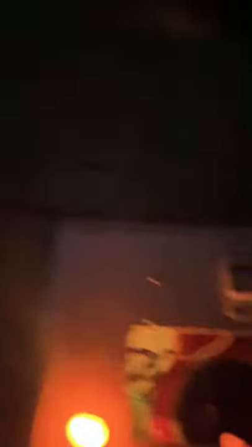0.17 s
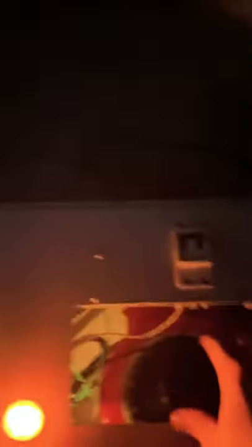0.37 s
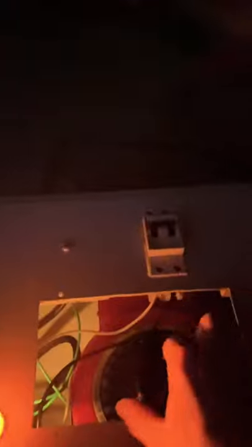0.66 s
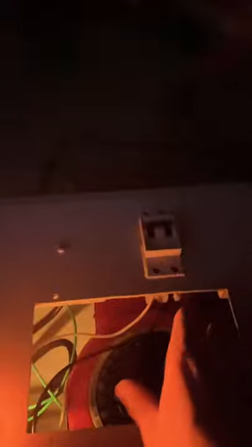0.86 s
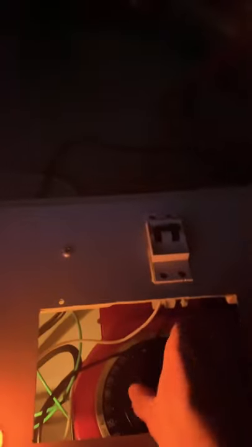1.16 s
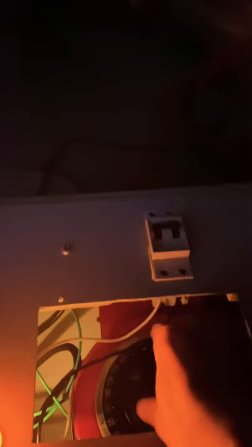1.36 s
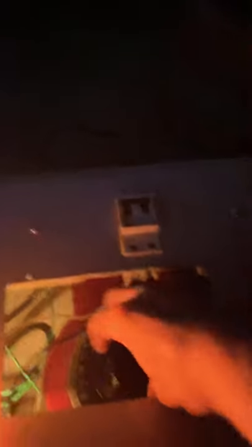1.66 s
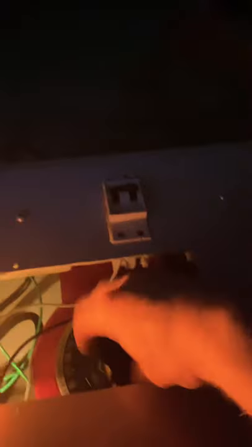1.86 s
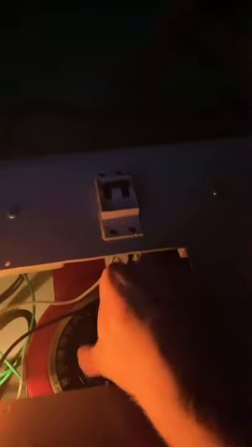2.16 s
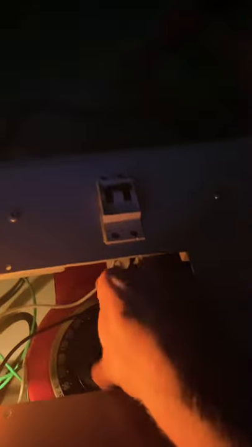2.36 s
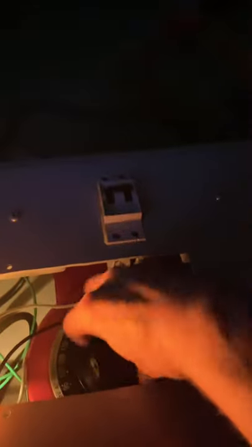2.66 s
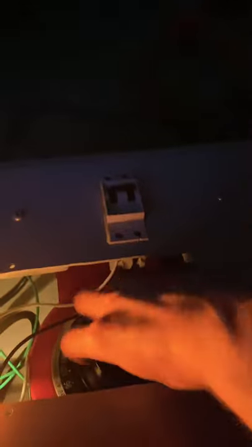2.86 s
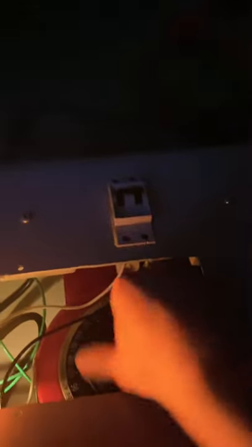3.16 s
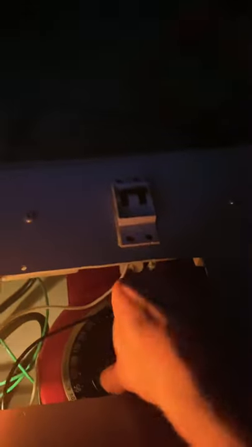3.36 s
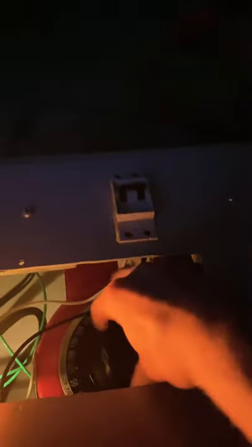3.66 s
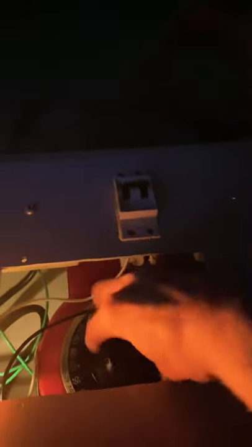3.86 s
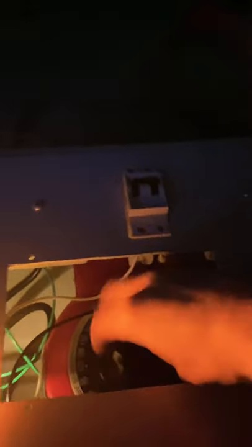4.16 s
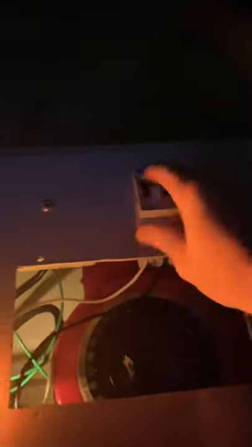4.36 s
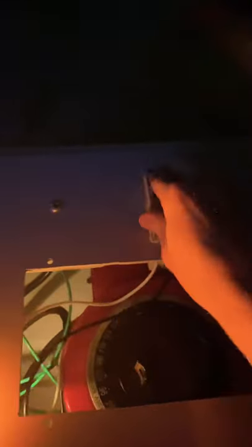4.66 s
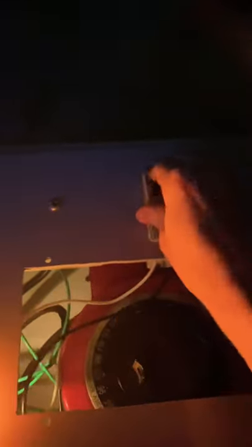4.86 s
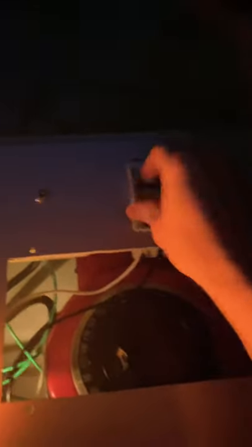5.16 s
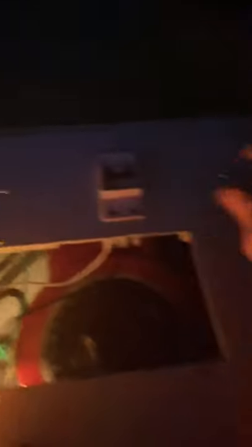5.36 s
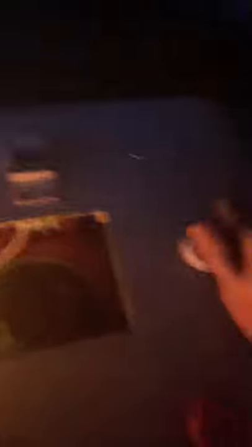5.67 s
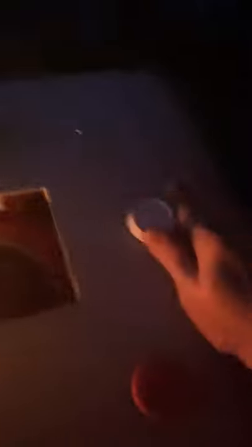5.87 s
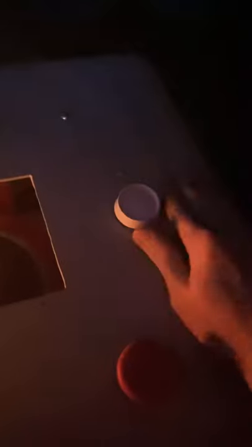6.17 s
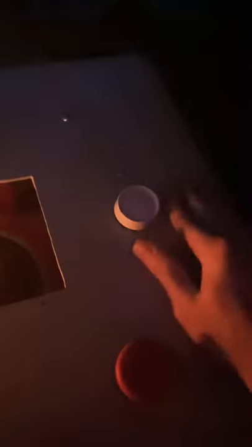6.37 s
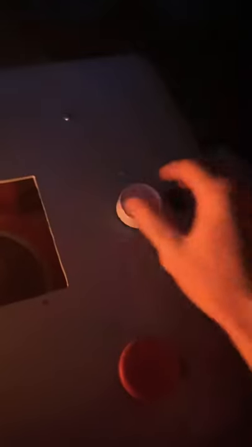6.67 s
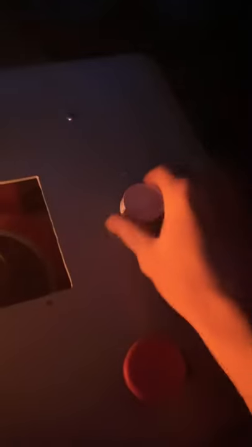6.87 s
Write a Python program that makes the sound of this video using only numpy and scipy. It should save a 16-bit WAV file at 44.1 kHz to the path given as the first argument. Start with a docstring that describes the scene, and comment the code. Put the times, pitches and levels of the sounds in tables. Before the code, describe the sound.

From the first instant a loud, harsh electrical buzz fills a walled yard at night: dense bright spark cracks bunched at twice mains rate, over a low throb, with ringing wall echoes. It weakens slightly until about 2.5 seconds, then breaks up into sparse, uneven snaps. From 2.8 to 3.6 seconds these run as a rapid rattle of single sharp cracks with low punches, spacing out towards the end; a last soft low thud comes near 3.75. The echoes die, revealing a much quieter wavering motor whine with airy whirr and faint hiss. A crisp dial click lands at 3.9, and a hard breaker snap with a panel thud at 4.9. Faint low handling rumble rises around 5.6. At 6.2 a tiny knob click switches off the motor; it coasts down in pitch and fades by 7, with two dull, faint case knocks near 6.75.

```python
"""A rotary spark gap fires a high-voltage coil in a walled yard, over motor whine, night hiss and rumble.
A hand turns the supply dial down: the mains-locked buzz of noise cracks, low pushes and echoes thins
out to single cracks, stops, and leaves one last low push. The gap motor, wavering sines over coloured
noise, whines on; the dial clicks and a breaker snaps, each a set of dying modes with a burst of noise.
A small knob clicks, the motor is switched off and coasts down, and the hand knocks against the case."""
import sys
import numpy as np
from scipy import signal
from scipy.fft import rfft, irfft, next_fast_len
from scipy.io import wavfile
from scipy.ndimage import uniform_filter1d

SR = 44100
rng = np.random.default_rng(int(sys.argv[2]) if len(sys.argv) > 2 else 0)


def attenuation_scalar(level_db):
    """Turn a level in dB into a linear amplitude multiplier (20 dB per decade)."""
    decades = np.asarray(level_db, float) / 20
    return 10 ** decades


def digitize_waveform(pressure):
    """Quantize a signal to 16-bit integers and store it at the path in sys.argv[1].

    Rows of a 2-D input are taken as channels; values are limited to [-1, 1].
    """
    field = np.atleast_2d(pressure).T
    bounded = np.clip(field, -1, 1)
    quanta = np.round(bounded * 32767).astype(np.int16)
    wavfile.write(sys.argv[1], SR, quanta)


N = 309141

# buzz of bunched sparks: start_s, relative_level_db, sparks_per_half_cycle
BUZZ = [(0.0, -28, 2.6), (0.101, -28.5, 3.45), (1.201, -29, 3.63), (1.63, -31.5, 2.98), (2.21, -31.5, 2.8),
        (2.55, -32, 2.87)]
BUZZ_END_S = BUZZ[-1][0]
MAINS_BEATS_PER_S = 120  # half cycles


def evened(x):
    """Scales to rms 1."""
    return x / np.sqrt(np.mean(x ** 2) + 1e-30)


def read(points, hz):
    """Reads a table on a log-frequency axis."""
    f, value = np.transpose(points)
    return np.interp(np.log(hz + 1), np.log(f + 1), value)


def colour(x, points, peaks=()):
    """Causal minimum-phase filter with the given spectrum and resonances."""
    hz = abs(np.fft.fftfreq(8192, 1 / SR))
    db = read(points, hz) + sum(d / (1 + (2 * (hz - f) / w) ** 2) for f, w, d in peaks)
    log_spectrum = np.conj(signal.hilbert(np.log(attenuation_scalar(db))))
    taps = np.fft.ifft(np.exp(log_spectrum)).real[:4096]
    taps = taps.reshape((1,) * (x.ndim - 1) + (-1,))
    return signal.oaconvolve(x, taps, axes=-1)[..., :x.shape[-1]]


def train(s, gain):
    """Impulses at the given moments."""
    return np.bincount(np.clip(np.round(s * SR).astype(int), 0, N - 1), gain, N)


def wander(size):
    """Slow random curve of rms 1, noise smoothed twice over size samples."""
    return evened(uniform_filter1d(uniform_filter1d(rng.standard_normal(N), size), size))


def patchy(x, patch_db, bins, frames):
    """Lets patches of a sound swell and sink; patch size in bins of 43 Hz and steps of 12 ms."""
    hz, t, z = signal.stft(x, SR, nperseg=1024)
    patches = uniform_filter1d(rng.standard_normal(z.shape[1:]), bins, axis=0)
    patches = uniform_filter1d(patches, frames, axis=1)
    return signal.istft(z * attenuation_scalar(patch_db * evened(patches)), SR, nperseg=1024)[1][:, :N]


def ports(pair):
    """Turns two unrelated versions of a sound into what two nearby microphone ports pick up."""
    # likeness of the ports: frequency_hz, likeness
    likeness = [(60, .999), (125, .999), (330, .98), (500, .89), (770, .6), (1170, .55), (1800, .83),
                (2800, .4), (4300, .5), (5800, .75), (6600, .994), (17000, .995)]
    # stereo phase: frequency_hz, left_lead_half_turns
    port_lead = [(0, 0), (3500, .1), (5800, .3), (6750, 1), (7900, 1), (9300, 2), (11400, 2), (12650, 3),
                 (14300, 3), (15500, 4), (17000, 4)]
    size = next_fast_len(N + 4096)
    hz = np.fft.rfftfreq(size, 1 / SR)
    a, b = rfft(pair, size)
    same = np.clip(read(likeness, hz), 0, 1)
    turn = np.exp(.5j * np.pi * np.interp(hz, *np.transpose(port_lead)))
    shared = np.sqrt((1 + same) / 2) * a
    apart = np.sqrt((1 - same) / 2) * b
    return irfft(np.array([(shared + apart) * turn, (shared - apart) / turn]), size)[:, :N]


def yard(x, onset_s=0.0038, early=2.2, early_s=0.082):
    """Dense echoes, strongest from the near walls, each band dying at its own speed; energy 1."""
    # decay of the yard: frequency_hz, t60_s
    yard_decay = [(100, 0.24), (400, 0.64), (1000, 0.58), (2500, 0.92), (5000, 0.74), (8000, 0.61),
                  (12000, 0.49), (16000, 0.26)]
    hz, t, z = signal.stft(rng.standard_normal((2, SR)), SR, nperseg=256)
    decay = attenuation_scalar(-60 * t / read(yard_decay, hz)[:, None])
    tail = signal.istft(z * decay, SR, nperseg=256)[1]
    t = np.arange(tail.shape[1]) / SR
    tail = tail * np.clip(t / onset_s, 0, 1) ** 2 * (1 + early * np.exp(-t / early_s))
    return signal.oaconvolve(x[None], tail / np.linalg.norm(tail[0]), axes=1)[:, :N]


def drifting_yard(x, drift_s=1.4):
    """Three echo patterns take turns as the hand-held microphone drifts through them."""
    turn = np.pi * np.arange(len(x)) / SR / drift_s
    return sum(yard(x * np.sqrt(2 / 3) * abs(np.cos(turn + k * np.pi / 3))) for k in range(3))


def singles(chance_db=-24, chance_end_s=2.75, chance_window=.3, first_half_share=.6, recharge_s=.007):
    """Listed single sparks, and chance sparks in the gaps, early in either half cycle."""
    # single sparks at low voltage: start_s, level_db
    listed_sparks = [(2.6, -25.5), (2.6587, -24), (2.71, -35), (2.7592, -31.5), (2.785, -23), (2.8035, -24),
                     (2.8191, -26.5), (2.833, -26), (2.8504, -20.5), (2.8853, -25), (2.9, -22.5),
                     (2.9327, -25.5), (2.9428, -25.5), (2.9588, -24), (2.977, -24.5), (2.999, -27.5),
                     (3.01, -27), (3.0261, -23.5), (3.0418, -27), (3.052, -24.5), (3.068, -29),
                     (3.084, -22.5), (3.093, -29.5), (3.1099, -26), (3.124, -23.5), (3.143, -24.5),
                     (3.1593, -20.5), (3.176, -24), (3.1951, -21.5), (3.21, -28), (3.2273, -20.5),
                     (3.242, -27.5), (3.258, -22), (3.2684, -21.5), (3.2990, -18.5), (3.3191, -27.5),
                     (3.3491, -18.5), (3.3835, -21.5), (3.3935, -21.5), (3.41, -28), (3.4503, -17.5),
                     (3.4624, -27), (3.5016, -19.5), (3.5364, -19.5), (3.5852, -18)]
    listed_s, listed_db = np.transpose(listed_sparks)
    # one chance candidate per full mains cycle
    beats = np.arange(int(BUZZ_END_S * MAINS_BEATS_PER_S) + 1, int(chance_end_s * MAINS_BEATS_PER_S), 2)
    half, place = rng.random((len(beats), 2)).T
    chance_s = (beats + (half > first_half_share) + chance_window * place) / MAINS_BEATS_PER_S
    chance_s = chance_s[abs(chance_s[:, None] - listed_s).min(1) > recharge_s]
    at = np.append(listed_s, chance_s)
    db = np.append(listed_db, np.full(len(chance_s), chance_db))
    order = np.argsort(at)
    return at[order], db[order]


def firings(single_s, single_db, spread_db=3.5, crack_s=0.0021):
    """Moments and sizes of all sparks: bunches locked to the mains, then single ones."""
    s, level_db, per_beat = np.transpose(BUZZ)
    beats = np.arange(-60, int(BUZZ_END_S * MAINS_BEATS_PER_S))
    place, chance, size = rng.random((len(beats), 6, 3)).T
    # six slots in the part of the half cycle with enough voltage
    window_start, window_length = -.1, .42  # half cycles
    slot = (np.arange(6)[:, None] + place) / 6
    at = (beats + window_start + window_length * slot) / MAINS_BEATS_PER_S
    count = np.clip(np.interp(at, s, per_beat), .5, 6)
    gain = attenuation_scalar(np.interp(at, s, level_db) + spread_db * (2 * size - 0.5))
    gain = gain * np.sqrt(SR / MAINS_BEATS_PER_S / count)
    single = attenuation_scalar(single_db) * np.sqrt(crack_s * SR)
    return np.append(at, single_s), np.append(gain * (chance < count / 6), single)


def thump(x, lag_cycles=1.177):
    """The low push sweeps downward: the deeper the part, the later it comes."""
    # low push of a spark: frequency_hz, relative_db_per_hz
    push_colour = [(25, -23.5), (60, 0), (120, -2), (200, -4), (400, -3), (900, -5.5), (1800, -4.5),
                   (3000, -34), (5000, -72)]
    hz = np.fft.rfftfreq(8192, 1 / SR)
    late = np.exp(-2j * np.pi * lag_cycles * np.log(1 + hz / 15) + 2j * np.pi * hz * lag_cycles / 2500)
    kernel = np.roll(irfft(attenuation_scalar(read(push_colour, hz)) * late), 2048)
    return signal.oaconvolve(x, kernel / np.linalg.norm(kernel))[2048:][:N]


def pushes(single_s, spread_db=3.5, scatter_s=0.00061, power=0.53, bunch_s=0.0018, ground=0.64,
           sharpen_s=.8):
    """A low push per half cycle of buzz and per single spark; a longer charge pushes harder."""
    # push after one half cycle of charging: start_s, level_db
    push_level = [(0, -31.5), (1.5, -33), (2.3, -29.5), (2.6, -23.5), (3.0, -20.5), (3.3, -24),
                  (3.6, -22.5)]
    # last low push, without a crack: start_s, level_db
    last_s, last_db = (3.742, -31)
    beats = (np.arange(int(BUZZ_END_S * MAINS_BEATS_PER_S)) + 0.087) / MAINS_BEATS_PER_S
    size, late = rng.standard_normal((len(beats) + len(single_s), 2)).T
    at, n = np.append(beats, single_s), len(beats)
    charge = (np.diff(at, prepend=-1 / MAINS_BEATS_PER_S) * MAINS_BEATS_PER_S) ** power
    size[n:] /= 4  # a lone spark empties a full charge, so it varies little
    gain = charge * attenuation_scalar(np.interp(at, *np.transpose(push_level)) + spread_db * size)
    # bunched sparks smear their pushes into one dull throb; lone sparks gain a sharp front
    blur = np.hanning(round(2 * bunch_s * SR))
    sharp = np.clip((at - BUZZ_END_S) / sharpen_s, 0, 1)
    at[:n] += scatter_s * late[:n]
    dull = train(np.append(at, last_s), np.append(gain * (1 - sharp), attenuation_scalar(last_db)))
    dull = signal.oaconvolve(dull, blur / blur.sum())[:N]
    low = thump(dull + train(at, gain * sharp))
    return np.array([low, ground * np.roll(low, 200)])  # weaker version off the ground, 4.5 ms later


def swayed(pair, body_width_hz=130):
    """The lead of one port over the other follows the turning of the hand; a low band of the roar drifts."""
    # hand turning the ports against the coil: start_s, low_lead_half_turns, middle_lead_half_turns
    sway = [(0, 0, 0.027), (.15, 0, 0.28), (.22, 0.034, 0.94), (.35, 0, 1), (0.451, 0, 0.082),
            (1.35, 0, 0.53), (1.45, 0, 0.65), (1.55, 0, 0), (1.85, 0, 0.65), (2.2, 0.0028, 0.66),
            (2.5, 0.16, 0), (2.75, 0.21, 0), (2.9, 0.62, 0.09), (3.7, 0.43, 0.37)]
    # low band's share in the sway: frequency_hz, share
    low_share = [(100, 0), (250, 0.5), (500, 0.97), (700, 0.12)]
    # middle band's share in the sway: frequency_hz, share
    middle_share = [(500, 0), (750, 1), (1500, 0.2), (2200, 0.06)]
    # drifting low band: start_s, centre_hz, boost_db
    body_drift = [(0, 468, 7.5), (.4, 470, 4), (.55, 414, 6), (1.2, 416, 6), (1.6, 426, 8), (1.9, 380, 5),
                  (2.25, 370, 10.5), (2.6, 384, 6), (3.0, 375, 7), (3.7, 380, 0)]
    hz, t, z = signal.stft(pair, SR, nperseg=2048)
    s, low, middle = np.transpose(sway)
    lead = np.outer(read(low_share, hz), np.interp(t, s, low))
    lead = lead + np.outer(read(middle_share, hz), np.interp(t, s, middle))
    turn = np.exp(.5j * np.pi * lead)
    s, body_hz, body_db = np.transpose(body_drift)
    off = 2 * (hz[:, None] - np.interp(t, s, body_hz)) / body_width_hz
    body = attenuation_scalar(np.interp(t, s, body_db) / (1 + off ** 2))
    return signal.istft(z * body * np.array([turn, 1 / turn]), SR, nperseg=2048)[1][:, :N]


def sparks(buzz_db=-2.5, buzz_echo_db=1., single_echo_db=.3, brief_from_s=3.44):
    """Every spark is a ragged crack of a few milliseconds and yard echoes, over the low pushes."""
    # spark spectrum: frequency_hz, relative_db_per_hz
    spark_colour = [(150, -41), (300, -11.5), (750, -11), (1100, -10.5), (1700, -12), (2300, -1.5),
                    (3000, -3.5), (3700, -7), (4800, 0.6), (6500, -0.5), (8500, -0.37), (10500, -2),
                    (13500, 3.5), (15500, -3.5)]
    # first arrival over the echoes: frequency_hz, tilt_db
    crack_tilt = [(150, -2.5), (1500, 0.5), (5000, 1), (9000, 4), (13000, 1), (16000, 6.5)]
    # standing echoes of the yard: frequency_hz, width_hz, level_db
    yard_peaks = [(893, 60, 10.5), (1181, 81, 5), (1503, 320, 8), (2060, 180, 4.5), (2156, 70, 10),
                  (2320, 140, -12.5), (2630, 59, 5), (2700, 99, 8), (3680, 500, 1), (4177, 45, 8),
                  (4730, 70, 5.5), (4930, 180, -0.5), (5275, 83, 6), (5710, 60, 4.5), (8020, 180, 8),
                  (13800, 810, 3.5)]
    # arrivals within one crack: delay_s, level_db, t60_s
    arrivals = [(0, -1, .006), (.001, 0, .007), (.003, -8, .012)]
    single_s, single_db = singles()
    at, gain = firings(single_s, single_db)
    buzzing = at < BUZZ_END_S
    gain[buzzing] *= attenuation_scalar(buzz_db)
    # crack kinds: eight long ones, then four brief ones for the last sparks, which quench at once
    last = at > brief_from_s
    kind = rng.integers(0, 8, len(at)) // np.where(last, 2, 1) + 8 * last
    t = np.arange(400) / SR
    shape = sum(np.clip((t - late) / 0.0011, 0, 1) * attenuation_scalar(db - 60 * np.maximum(t - late, 0) / t60)
                for late, db, t60 in arrivals)
    quench = attenuation_scalar(-60 * np.maximum(t - .0015, 0) / .012)
    brief = np.where(np.arange(12)[:, None, None] >= 8, quench, 1)
    cracks = colour(rng.standard_normal((12, 2, 400)) * shape * brief, spark_colour)
    cracks = colour(cracks, crack_tilt)
    cracks /= np.linalg.norm(cracks, axis=2, keepdims=True)
    near = 0
    for k in range(12):
        hits = train(at, gain * (at >= 0) * (kind == k))
        near = near + signal.oaconvolve(hits[None], cracks[k], axes=1)[:, :N]
    ahead_s = .5  # firing before the start, so that the yard is already ringing
    clicks = train(at + ahead_s, gain * attenuation_scalar(np.where(buzzing, buzz_echo_db, single_echo_db)))
    spark = colour(np.eye(1, 4096)[0], spark_colour, yard_peaks)
    clicks = signal.oaconvolve(clicks, spark / np.linalg.norm(spark))[:N]
    far = drifting_yard(clicks)[:, round(ahead_s * SR):]
    far = np.pad(far, ((0, 0), (0, N - far.shape[1])))
    far = patchy(far, patch_db=1.1, bins=10, frames=40)  # bright and hollow bands shift about
    return swayed(ports(near + far + pushes(single_s)))


def motor(waver_db=1.1, side_waver=1.6, coast_waver_db=4, throb=.2, left_db=-1.):
    """Shaft orders waver over a whirr of air that throbs as the six electrodes pass per turn."""
    # loudness: start_s, whine_db, ninth_multiple_db, whine_octave_db, whirr_db
    motor_levels = [(0, -72, -84, -101, -81), (3.9, -74.5, -89, -78.5, -76), (4.3, -70.5, -89, -81, -69.5),
                    (4.7, -69, -83, -80, -68), (5.3, -69, -84, -78.5, -68), (5.56, -67.5, -83, -74, -69),
                    (6.2, -66.5, -90, -72, -70), (6.265, -72, -96, -80, -68), (6.31, -75, -92, -68, -72),
                    (6.375, -78, -91, -71.5, -73), (6.405, -81, -96.5, -76, -73),
                    (6.46, -81, -97, -77, -74.5), (6.49, -79, -89, -88, -75.5),
                    (6.54, -82, -85.5, -74, -80), (6.57, -85, -90.5, -90.5, -78), (6.7, -85, -88, -94, -83),
                    (6.81, -89, -92, -89, -84.5), (7.02, -110, -110, -102, -96)]
    # shaft orders: multiple_of_shaft_speed, level_over_whine_db
    whine_orders = [(2, -19), (5, -20), (6, 1), (7, -15.5), (10, -16), (15, -15.5), (18, -11.5), (24, -14),
                    (25, -14), (26, -21.5), (30, -14.5), (45, -18.5)]
    # air spectrum: frequency_hz, relative_db_per_hz
    whirr_colour = [(60, -9.5), (150, -11), (300, -4.5), (700, -0.5), (1400, -1), (2200, -1.1), (3200, 0.5),
                    (4500, -3), (6500, -19.5), (8500, -18), (11000, -22), (13000, -33.5), (15500, -41.5)]
    # resonances of the motor housing: frequency_hz, width_hz, level_db
    housing = [(1362, 82, 3), (1505, 86, 5), (2103, 250, 5.5), (2600, 130, -1.5), (3130, 250, -4),
               (3575, 120, -0.5), (3950, 180, -0.5), (1150, 100, -5.5)]
    run_turns_per_s, off_s, coast_s, dull_db_per_s = 87.65, 6.212, 1.5, 3.5
    s, *columns = np.transpose(motor_levels)
    t = np.arange(N) / SR
    whine_db, ninth_db, octave_db, whirr_db = (np.interp(t, s, c) for c in columns)
    since_off = np.maximum(t - off_s, 0)
    turns = np.cumsum(run_turns_per_s * np.exp(-since_off / coast_s)) / SR
    coasting = np.clip((t - off_s) / .1, 0, 1)
    # while coasting, multiples above the sixth fade faster the higher they are
    orders = [(k, db + whine_db - max(k - 6, 0) * dull_db_per_s * since_off) for k, db in whine_orders]
    whine = 0
    for k, db in orders + [(9, ninth_db), (12, octave_db)]:
        waver = waver_db * (1 if k % 6 == 0 else side_waver) * wander(4000)
        waver = waver + coast_waver_db * coasting * wander(900)
        whine = whine + attenuation_scalar(db + waver) * np.sqrt(2) * np.sin(2 * np.pi * (k * turns + rng.random()))
    air = colour(rng.standard_normal((2, N)), whirr_colour, housing)
    air = evened(patchy(air, patch_db=.8, bins=8, frames=10))
    air = air * (1 + throb * np.cos(2 * np.pi * 6 * turns))
    return whine * attenuation_scalar([[left_db], [-left_db]]) + ports(attenuation_scalar(whirr_db) * air)


def night(hiss_db=-79.5):
    """Quiet outdoor hiss and a faint wandering low rumble, both coloured noise."""
    # hiss spectrum: frequency_hz, relative_db_per_hz
    hiss_colour = [(40, -24.5), (80, -12), (200, -14.5), (500, -5.5), (1200, -9), (2500, -20.5),
                   (3200, -32.5), (4300, -24.5), (6000, -36.5), (10000, -39), (15000, -48)]
    # rumble loudness: start_s, level_db
    rumble_level = [(0, -100.5), (4.2, -110), (5, -96), (5.6, -82), (6.3, -91), (6.5, -79.5), (7.02, -84)]
    # rumble spectrum: frequency_hz, relative_db_per_hz
    rumble_colour = [(20, -24.5), (55, 0.0), (90, -6.5), (160, -18.0), (1000, -70.5)]
    hiss = attenuation_scalar(hiss_db) * ports(evened(colour(rng.standard_normal((2, N)), hiss_colour)))
    low = evened(colour(rng.standard_normal(N), rumble_colour))
    return hiss + low * attenuation_scalar(np.interp(np.arange(N) / SR, *np.transpose(rumble_level)))


def ring(modes, t):
    """Sum of dying modes."""
    return sum(attenuation_scalar(db - 60 * t / t60) * np.sin(2 * np.pi * hz * t) for hz, db, t60 in modes)


def bounced(blows, count=2, gap_s=0.0039, rise_db=1):
    """Repeats the last blow, each bounce a little louder and with a still stronger panel thud."""
    s, db, crack_db, panel_db = blows[-1]
    return [*blows, *((s + k * gap_s, db + k * rise_db, crack_db, panel_db + 3 * k * rise_db)
                      for k in range(1, count + 1))]


def switches(echo_db=-12, crack_t60_s=0.022, rattle_db=-15, rattle_t60_s=0.09, rise_s=.0007):
    """Each blow rings its part, cracks briefly and thuds the panel; the cracks echo."""
    # modes of dial, breaker, small knob, case and panel: frequency_hz, level_db, t60_s
    dial_modes = [(1560, -24, 0.1), (2140, -11.5, 0.044), (2320, -6.5, 0.022), (3460, -19, .02),
                  (4740, -16, 0.05), (5340, 1, 0.019), (5450, -3, 0.022), (8400, -7, 0.016),
                  (10100, -3.5, 0.016)]
    breaker_modes = [(1140, 2, 0.038), (1730, -4, 0.049), (2455, 2.5, 0.023), (3200, -1, 0.021),
                     (3270, 5, 0.016), (4250, -2, .03), (4740, -9, .02), (5330, -9, .015), (5400, 4, 0.018),
                     (8800, 3, .01), (10000, 9, 0.012), (13000, -2, .008), (15000, -3, 0.0055)]
    knob_modes = [(1480, 1, .03), (2650, 9.5, 0.039), (3930, 9, 0.024), (4300, 8, .02), (5430, 6, 0.017)]
    case_modes = [(242, 9, 0.037), (530, 1, .04), (700, -10, .04), (1040, 5, 0.046), (1250, 1, 0.037),
                  (1491, 6, .04), (3700, -6, .04), (4890, -8, .04), (5270, -8, .04)]
    panel_modes = [(195, 0, 0.16), (260, 7, 0.088), (133, 0, 0.11), (315, 2.5, .06)]
    # blows on each: start_s, level_db, crack_over_ring_db, panel_db
    dial_blows = [(3.9127, -38.5, -16, -73), (3.918, -51.5, 2, -76)]
    breaker_blows = [(4.765, -90, 2, -73.5), (4.9048, -51.5, 7, -80), (4.9067, -43, 9, -46),
                     (4.9082, -48, 11.5, -60)]
    knob_blows = [(6.213, -70, 2.1, -90)]
    case_blows = [(6.747, -72, -10, -72), (6.766, -78, -8, -69)]
    # crack of a blow: frequency_hz, relative_db_per_hz
    snap_colour = [(100, -11), (800, 0), (2500, 0.5), (6000, 4.5), (11000, -1.5), (16000, 2)]
    t = np.arange(SR // 3) / SR
    out, snaps, low = np.zeros((2, N)), np.zeros((2, N)), np.zeros(N)
    for blows, modes in ((dial_blows, dial_modes), (bounced(breaker_blows), breaker_modes),
                         (knob_blows, knob_modes), (case_blows, case_modes)):
        for s, db, crack_db, panel_db in blows:
            at = slice(round(s * SR), min(round(s * SR) + len(t), N))
            u = t[:at.stop - at.start]
            out[:, at] += attenuation_scalar(db) * ring(modes, u) * np.minimum(u / rise_s, 1)
            decay = attenuation_scalar(-60 * u / crack_t60_s) + attenuation_scalar(rattle_db - 60 * u / rattle_t60_s)
            snaps[:, at] += attenuation_scalar(db + crack_db) * decay * rng.standard_normal((2, len(u)))
            swell = np.sin(.5 * np.pi * np.minimum(u / 0.013, 1)) ** 2
            low[at] += attenuation_scalar(panel_db) * ring(panel_modes, u) * swell
    snaps = colour(snaps, snap_colour)
    mix = ports(out + snaps + attenuation_scalar(echo_db) * yard(snaps[0])) + low
    # the blows and panel thuds carry nothing below about 95 Hz
    return signal.sosfilt(signal.butter(2, 95, "high", fs=SR, output="sos"), mix)


def scene():
    """All sources over the quiet of the night."""
    return sparks() + motor() + night() + switches()


def top_cut(x):
    """Nothing passes above the cut-off."""
    return signal.sosfilt(signal.butter(12, 17100, fs=SR, output="sos"), x)


def record(dry):
    """Limits the band at the top."""
    edge_hz = 15780
    edge = signal.firwin(255, edge_hz, window=("kaiser", 8), fs=SR)
    mix = signal.oaconvolve(dry, edge[None], "same")
    return top_cut(mix)


dry = scene()
out = record(dry)
digitize_waveform(out)
```